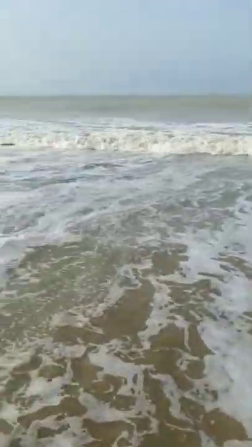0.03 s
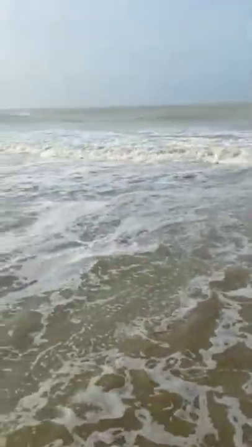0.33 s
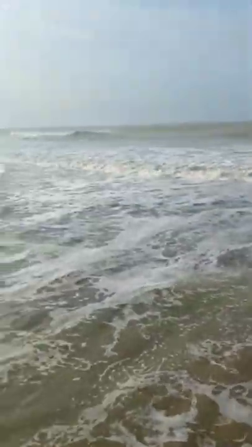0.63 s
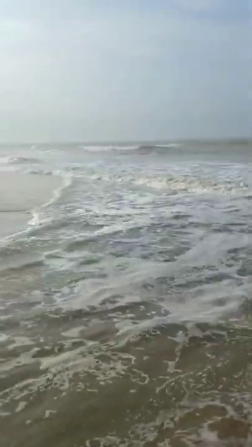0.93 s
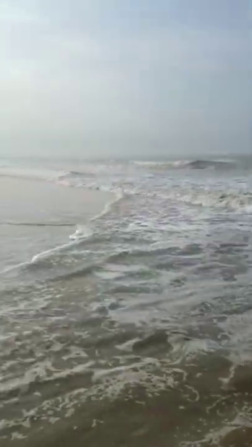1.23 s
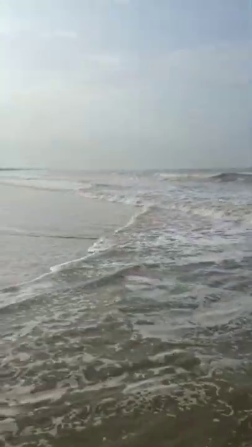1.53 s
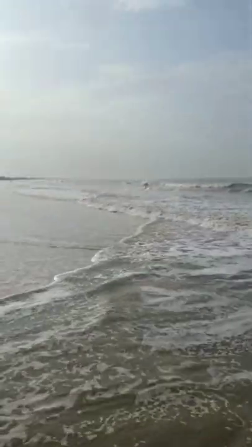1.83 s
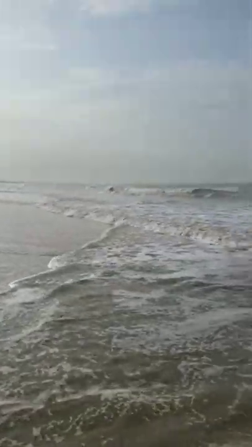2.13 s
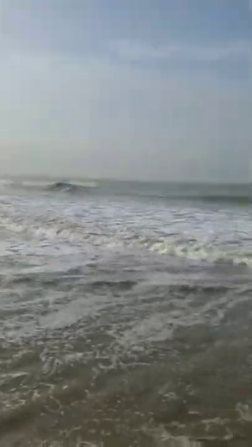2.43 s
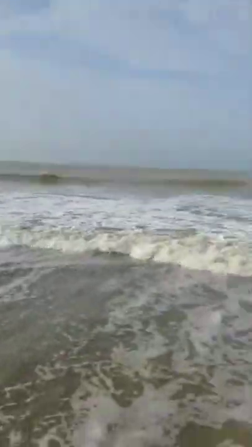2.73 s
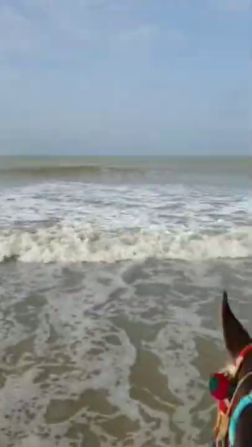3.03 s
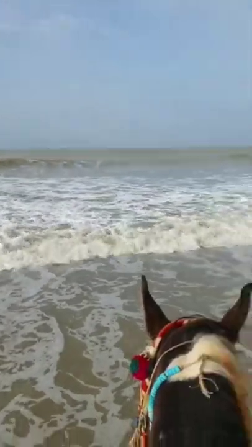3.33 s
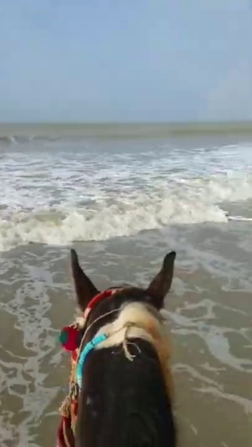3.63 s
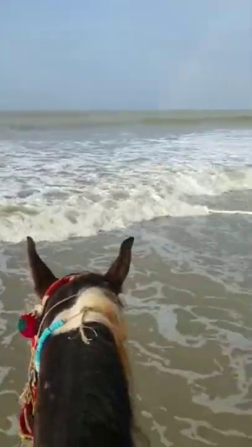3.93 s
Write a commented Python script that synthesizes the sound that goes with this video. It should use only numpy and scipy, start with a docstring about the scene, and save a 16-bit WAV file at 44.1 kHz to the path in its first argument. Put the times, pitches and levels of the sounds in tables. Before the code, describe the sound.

Gusts of wind rumble and slap right against the microphone at the edge of the sea. Behind them the surf washes steadily, then swells as a wave rolls closer and the wind drops.

```python
"""Surf and wind on a beach

A broken wave rolls up a shallow beach; the roar of tumbling water and the hiss of foam swell as it nears.
Turbulent air strikes the microphone, and the smaller the eddy, the higher its sound: large eddies rumble
and thump, small ones flutter, slap and snap. After three seconds the wind eases and the surf stands out.
Near the start a far bird whistles once, and a faint, thin sizzle comes and goes."""
import sys
import numpy as np
from scipy import signal
from scipy.fft import rfft, irfft
from scipy.io import wavfile
from scipy.ndimage import uniform_filter1d

SR = 44100
rng = np.random.default_rng(int(sys.argv[2]) if len(sys.argv) > 2 else 0)


def wav_out(sig):
    """Save sig, one row per channel (or a flat mono array), as 16-bit PCM at SR to the path in sys.argv[1]."""
    wavfile.write(sys.argv[1], SR, np.round(np.clip(np.atleast_2d(sig).T, -1, 1) * 32767).astype(np.int16))


N = 176400

# envelopes of the approaching wave: t/s, roar level/dB, foam level/dB
WAVE_ENVELOPES = [(0,-42,-55),(.7,-50,-56),(1.2,-50,-53),(2.0,-47.5,-52),(2.4,-41,-50.5),(2.75,-37.5,-48.5),(3.25,-34.5,-47),(3.6,-36,-47),(4,-33.5,-46)]
# spectrum of tumbling water: f/Hz, relative level/dB
ROAR_SPECTRUM = [(50,-44),(120,-6.5),(170,-10.5),(230,-0.5),(400,0.5),(560,0),(750,-11),(1000,-9.5),(1350,-15.5),(1750,-12),(2100,-13.5),(2600,-23.5),(3600,-27.5),(5000,-29.5),(9000,-47)]
# spectrum of bursting foam: f/Hz, relative level/dB
FOAM_SPECTRUM = [(1500,3.5),(3500,2),(4300,-3),(5500,0),(6800,-0.5),(7700,-4),(8800,-5.5),(9700,-2.5),(12300,-5.5),(14000,-6.5),(15500,-11)]
# envelope of the rumble between buffets: t/s, level/dB
RUMBLE_ENVELOPE = [(0,-42.5),(.12,-31),(.165,-66),(.22,-35),(.3,-28),(.52,-28.5),(.61,-30),(.73,-53),(.8,-32),(.93,-28),(.98,-53),(1.3,-58),(1.9,-74),(2.28,-76),(2.42,-53),(2.5,-65),(2.7,-61),(2.83,-57),(2.88,-38),(3.05,-40),(3.45,-40),(3.52,-47.5),(4,-42)]
# buffets of large eddies: t/s, peak level/dB, duration/s
BUFFET_PULSES = [(.042,-19.5,0.0094),(.126,-23,0.0075),(.199,-23,0.013),(.261,-18.5,0.015),(.308,-15,0.004),(.333,-19.5,0.0098),(.472,-16,0.0088),(.504,-17,0.004),(.537,-20,0.013),(.575,-22.5,.0076),(.636,-20,.014),(.687,-16.5,0.019),(.754,-18,0.01),(.86,-20,0.029),(.948,-13,0.015),(1.193,-21,0.015),(1.231,-34,0.0049),(2.311,-31.5,0.0056),(2.388,-24.5,0.0091),(2.426,-37,0.014),(2.589,-34,0.013),(2.773,-25,0.0048),(2.892,-20,0.032),(2.968,-23,0.029),(3.02,-28.5,.027),(3.152,-26.5,0.013),(3.252,-30.5,0.034)]
# spectrum of large eddies: f/Hz, relative level/dB
RUMBLE_SPECTRUM = [(20,-10),(35,-5.5),(65,2),(110,1),(160,-4.5),(240,-3),(320,-8.5),(450,-16.5),(800,-81),(3000,-100)]
# envelope of the flutter between slaps: t/s, level/dB
FLUTTER_ENVELOPE = [(0,-49),(.08,-74),(.135,-30),(.165,-41),(.27,-34),(.36,-39),(.41,-33.5),(.46,-38.5),(.58,-32),(.615,-25),(.7,-33),(.795,-31),(.835,-21.5),(.93,-27.5),(1.0,-26.5),(1.05,-44),(1.08,-28),(1.135,-31),(1.165,-54),(1.195,-28),(1.26,-34),(1.32,-32.5),(1.348,-68),(1.37,-31),(1.42,-36),(1.55,-36),(1.625,-39.5),(1.69,-35.5),(1.73,-29),(1.79,-30.5),(1.815,-44),(1.85,-36),(1.96,-38.5),(2.1,-44.5),(2.15,-51),(2.18,-31.5),(2.24,-40.5),(2.28,-42),(2.41,-45.5),(2.48,-32.5),(2.66,-28),(2.745,-32.5),(2.84,-29),(2.91,-23.5),(2.99,-48.5)]
# spectrum of a small eddy's pop: f/Hz, relative level/dB
POP_SPECTRUM = [(200,-6),(330,2.5),(480,1),(700,-4.5),(1000,-11),(1400,-17.5),(2000,-27),(3000,-35.5),(4500,-45.5),(9000,-60)]
# treble of the flutter and slaps: t/s, gain/dB
POP_TREBLE = [(0,-3.5),(.77,-5),(.9,-7.5),(1.1,-3.5),(1.38,3.5),(1.7,-6),(2.1,3.5),(2.53,-0.5),(2.6,7),(2.835,5.5),(2.88,-11)]
# tight bursts of small eddies: t/s, peak level/dB, duration/s
SLAP_PULSES = [(.04,-31,0.0063),(.4,-27,0.018),(.436,-21.5,0.0051),(.482,-23,0.0028),(.543,-22,0.0045),(.656,-20,0.0086),(.725,-21.5,.015),(.767,-18.5,.014),(.869,-14.5,0.0083),(.921,-16.5,0.018),(.932,-16.5,0.0052),(.948,-10,0.0024),(1.029,-21.5,0.0072),(1.143,-23,0.0085),(1.184,-16,0.0037),(1.305,-32,0.0064),(1.367,-24.5,.011),(1.385,-30,0.0027),(1.448,-25,0.0089),(1.483,-28,0.01),(1.574,-19.5,0.003),(1.597,-21,0.0072),(1.669,-23,0.0041),(1.716,-18.5,0.0046),(1.78,-26.5,0.005),(1.802,-21.5,0.0037),(1.83,-23,0.003),(1.908,-26,0.0055),(1.985,-36,0.0038),(2.004,-24.5,.007),(2.07,-25.5,0.0053),(2.084,-27,0.006),(2.115,-31.5,0.01),(2.247,-28.5,0.0049),(2.533,-26.5,0.0094),(2.592,-25,0.0099),(2.615,-29,0.013),(2.688,-23,0.0066),(2.715,-22.5,0.022),(2.832,-27,0.017),(2.885,-23.5,0.026)]
# call of a far shore bird: t/s, duration/s, start f/Hz, end f/Hz, peak level/dB
WHISTLE = (.04,.06,1750,1420,-41)
# faint swell of high hiss: t/s, peak level/dB, duration/s
SIZZLE_PULSES = [(.27,-66,0.18)]
# pressure swings of heavy eddies: t/s, envelope peak level/dB, f/Hz
PRESSURE_SWINGS = [(.436,-13.5,237),(.481,-8.5,217),(0.544,-12.5,150),(.67,-12,250),(0.873,-9,390),(.947,-8,97),(1.186,-20,170),(2.44,-17.5,266),(2.772,-21,330),(2.885,-12.5,272),(2.903,-15.5,134)]
# impacts of the smallest, fastest eddies: t/s, relative peak level/dB
SNAP_IMPULSES = [(0.5966,-29),(0.7686,-27.5),(0.9315,-23),(1.0269,-21),(1.317,-29),(1.3693,-30),(1.3833,-23),(1.551,-25.5),(1.664,-26),(1.8,-26.5),(2.593,-23),(2.614,-17),(2.712,-36)]
# spectrum of one snap: f/Hz, relative level/dB
SNAP_SPECTRUM = [(400,-4),(1000,3),(1700,7.5),(3000,-4.5),(4500,-10.5),(6500,-22),(10000,-26)]

POP_TREBLE_HZ = 1280   # corner of the treble shelf


def from_db(db):
    """Amplitude grows tenfold for every 20 dB."""
    return 10 ** (np.asarray(db) / 20)


def unit_rms(x):
    """Division by the rms gives a signal unit power."""
    return x / np.sqrt(np.mean(x ** 2) + 1e-20)


def envelopes(rows):
    """Linear interpolation turns each column of breakpoints into an envelope."""
    times, *columns = np.transpose(rows)
    return [np.interp(np.arange(N) / SR, times, column) for column in columns]


def drift(corner_hz):
    """Low-passed noise is a slow random fluctuation, here of rms 1."""
    step = 40   # samples per control point
    pole = np.exp(-2 * np.pi * corner_hz * step / SR)
    white = rng.standard_normal(N // step + 2002)
    slow = signal.lfilter([1], [1, -2 * pole, pole ** 2], white)[2000:]   # once the filter has settled
    return np.interp(np.arange(N) / step, np.arange(len(slow)), unit_rms(slow))


def colour(x, spectrum):
    """Multiplication in the frequency domain imposes a spectral envelope."""
    hz, db = np.transpose(spectrum)
    bin_hz = np.maximum(np.arange(N + 1) * SR / (2 * N), 1)
    gain = from_db(np.interp(np.log(bin_hz), np.log(hz), db))
    return irfft(rfft(x, 2 * N) * gain)[:N]


def butterworth(x, hz, kind, order=2):
    """A Butterworth filter has a maximally flat passband."""
    return signal.sosfilt(signal.butter(order, hz, kind, fs=SR, output="sos"), x + 1e-18)


def zero_phase(x, hz, kind, order=2):
    """Filtering forward and then backward cancels the phase shift."""
    forward = butterworth(x, hz, kind, order)
    return butterworth(forward[::-1], hz, kind, order)[::-1]


def brighten(x, treble_db, above_hz):
    """A time-varying shelf scales the treble and leaves the bass."""
    bass = zero_phase(x, above_hz, "low")
    return bass + (x - bass) * from_db(treble_db)


def pulse_power(rows):
    """Incoherent pulses add in power; each is a Gaussian whose duration is its full width at 1/e."""
    t = np.arange(N) / SR
    return sum(from_db(db) ** 2 * np.exp(-np.minimum((2 * (t - centre) / duration) ** 2, 60))
               for centre, db, duration in rows)


def wash(spectrum, spread_db, drift_hz):
    """Independent modulation of half-octave bands makes noise churn; the rms is 1."""
    edges_hz = np.geomspace(30, 19000, 19)
    white = rng.standard_normal((2, N))
    bands = [butterworth(white[k % 2], edges_hz[k:k + 2], "band") * from_db(spread_db * drift(drift_hz))
             for k in range(len(edges_hz) - 1)]
    return unit_rms(colour(sum(bands), spectrum))


def surf():
    """Many incoherent sources sum to noise: tumbling water roars and bursting foam hisses."""
    roar_db, foam_db = envelopes(WAVE_ENVELOPES)
    roar = from_db(roar_db + 0.5) * wash(ROAR_SPECTRUM, spread_db=2.35, drift_hz=11)
    foam = from_db(foam_db - 2.5) * wash(FOAM_SPECTRUM, spread_db=1.27, drift_hz=31)
    return roar + foam


def level_out(x, window_s):
    """Division by the running rms removes slow changes of level and keeps faster detail."""
    size = int(window_s * SR)
    power = uniform_filter1d(uniform_filter1d(x ** 2, size), size)
    return x / np.sqrt(np.abs(power) + 1e-14)


def rumble():
    """Large eddies cause slow pressure fluctuations; harder buffets reach higher frequencies."""
    level_db, = envelopes(RUMBLE_ENVELOPE)
    power = from_db(level_db + 2.2 * drift(39)) ** 2 + pulse_power(BUFFET_PULSES)
    treble_db = 0.12 * np.clip(10 * np.log10(power) + 7, -20, 10)
    noise = colour(rng.standard_normal(N), RUMBLE_SPECTRUM)
    lumps = brighten(noise, treble_db, above_hz=196)
    return from_db(0.5) * np.sqrt(power) * level_out(lumps, window_s=0.0054)


def eddies(per_second=2600, spread_db=2.5):
    """Small eddies arrive as a Poisson process: pressure impulses of random size and sign."""
    arrivals = rng.random(N) < per_second / SR
    size_db = spread_db * np.minimum(rng.exponential(1, N), 4)
    return arrivals * from_db(size_db) * rng.choice([-1, 1], N)


def wind_filter(x, cutoff_hz=250):
    """A wind-noise suppressor removes bass with a steep, zero-phase high-pass filter."""
    return zero_phase(x, cutoff_hz, "high", order=5)


def wind_pops(impulses):
    """Short, hollow wind pops, their bass removed by a zero-phase wind-noise filter."""
    return colour(wind_filter(impulses), POP_SPECTRUM)


def flutter(clump_spread_db=5.5):
    """Turbulence is intermittent: small eddies arrive in clumps, the stronger ones brighter."""
    level_db, = envelopes(FLUTTER_ENVELOPE)
    clump_db = clump_spread_db * np.minimum(drift(133), 2)
    pops = wind_pops(eddies() * from_db(clump_db))
    pops = brighten(pops, clump_db - clump_spread_db, POP_TREBLE_HZ)
    return from_db(level_db + 0.5) * level_out(pops, window_s=0.023)


def slaps():
    """Pops of small eddies packed into milliseconds fuse in the ear into one hard slap."""
    pops = level_out(wind_pops(eddies()), window_s=0.005)
    return wind_filter(np.sqrt(pulse_power(SLAP_PULSES)) * pops)


def bird():
    """A whistle is a pure tone; its phase is the integral of its frequency, which here falls."""
    onset, duration, start_hz, end_hz, db = WHISTLE
    progress = np.clip((np.arange(N) / SR - onset) / duration, 0, 1)
    hz = start_hz + (end_hz - start_hz) * progress
    envelope = from_db(db) * np.sin(np.pi * progress) ** 2
    return envelope * np.sin(2 * np.pi * np.cumsum(hz) / SR)


def sizzle(centre_hz=6950, width_hz=450):
    """Noise confined to a narrow, high band is heard as a thin sizzle."""
    edges_hz = [centre_hz - width_hz / 2, centre_hz + width_hz / 2]
    band = butterworth(rng.standard_normal(N), edges_hz, "band")
    return np.sqrt(pulse_power(SIZZLE_PULSES)) * unit_rms(band)


def thumps(half_width_cycles=0.58):
    """A heavy eddy forces the diaphragm through a swing or two; a smaller eddy gives a higher thump."""
    pressure = np.zeros(N)
    for centre, db, hz in PRESSURE_SWINGS:
        cycles = (np.arange(N) / SR - centre) * hz
        envelope = from_db(db) * np.exp(-np.minimum((cycles / half_width_cycles) ** 2, 20))
        pressure -= envelope * np.sin(2 * np.pi * cycles)
    return pressure


def snaps():
    """A brief impulse has a broad spectrum, so the smallest, fastest eddies make sharp ticks."""
    impulses = np.zeros(N)
    for onset, db in SNAP_IMPULSES:
        impulses[int(onset * SR)] += from_db(db - 1.5)
    unit_impulse = 1.0 * (np.arange(N) == N // 2)
    tick_height = colour(unit_impulse, SNAP_SPECTRUM).max()
    return colour(impulses, SNAP_SPECTRUM) / tick_height


def scene():
    """By superposition, the sounds of the shore and the wind at the microphone add in one channel."""
    treble_db, = envelopes(POP_TREBLE)
    large_eddies = rumble() + thumps()
    small_eddies = brighten(flutter() + slaps(), treble_db, POP_TREBLE_HZ) + snaps()
    return (surf() + bird() + sizzle() + large_eddies + small_eddies)[None]


def record(dry, cutoff_hz=15500):
    """An elliptic low-pass filter limits the bandwidth steeply."""
    return signal.sosfilt(signal.ellip(12, .1, 90, cutoff_hz, fs=SR, output="sos"), dry)


dry = scene()
out = record(dry)
wav_out(out)
```